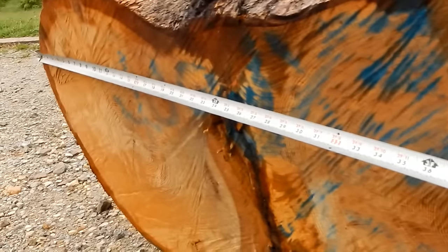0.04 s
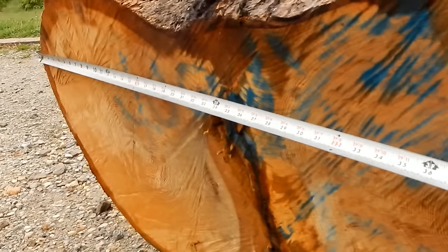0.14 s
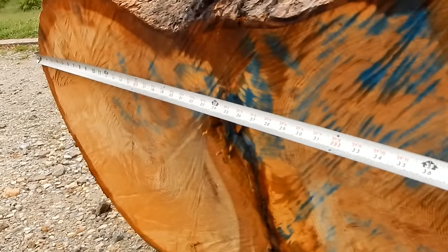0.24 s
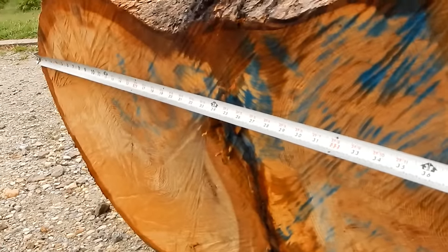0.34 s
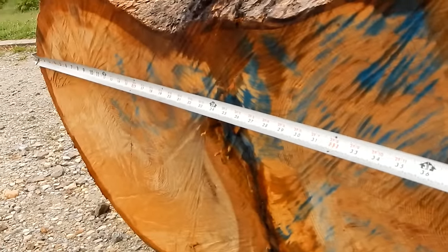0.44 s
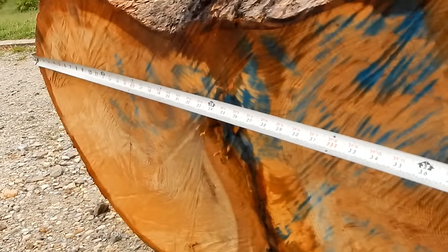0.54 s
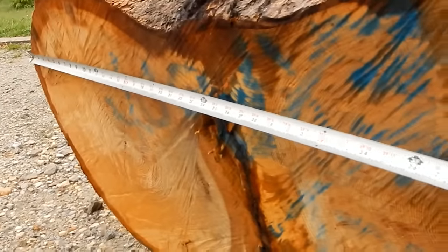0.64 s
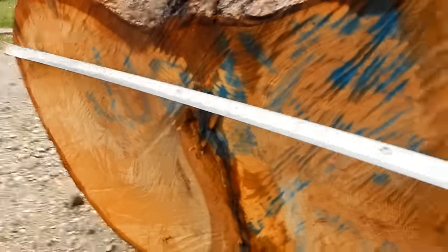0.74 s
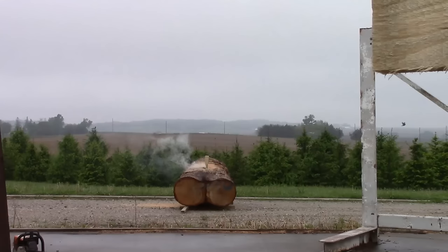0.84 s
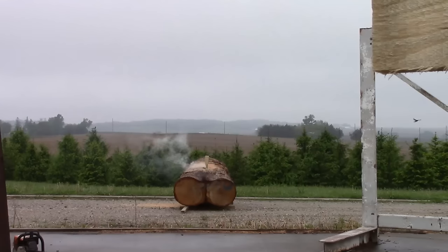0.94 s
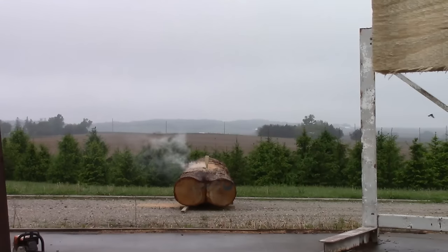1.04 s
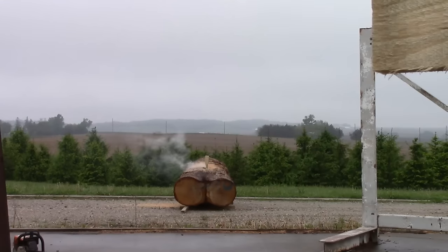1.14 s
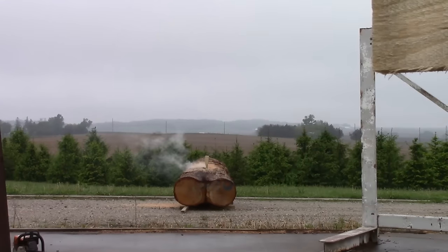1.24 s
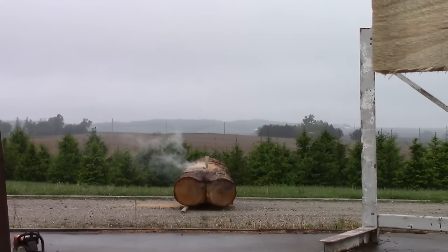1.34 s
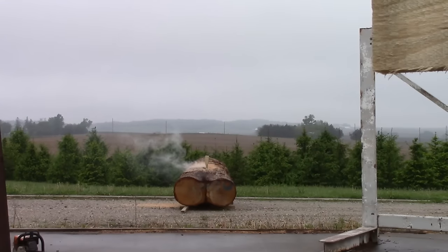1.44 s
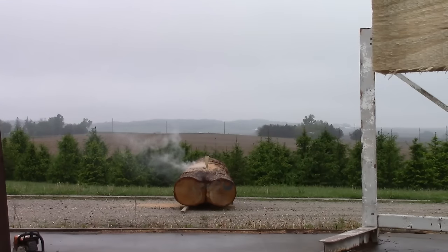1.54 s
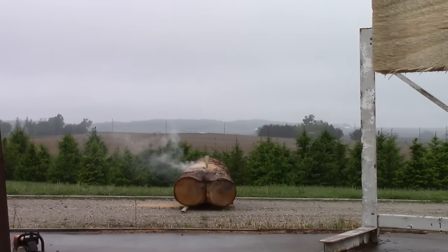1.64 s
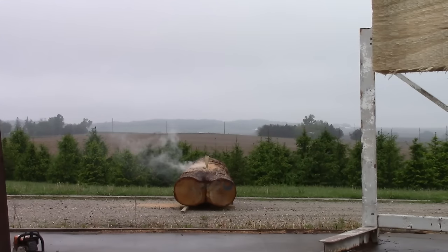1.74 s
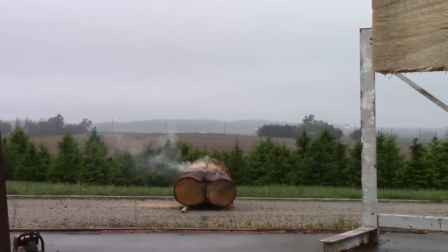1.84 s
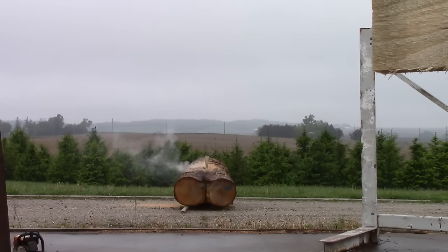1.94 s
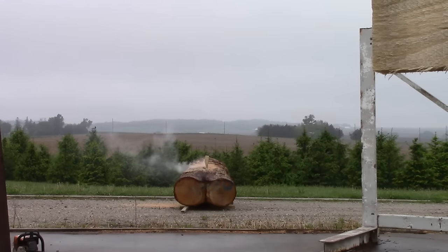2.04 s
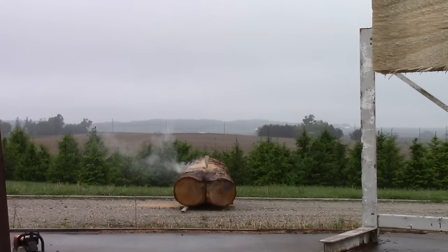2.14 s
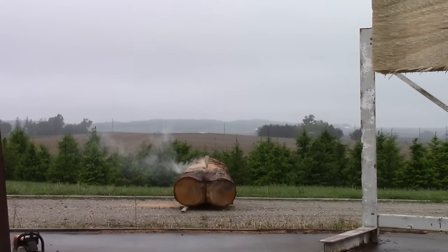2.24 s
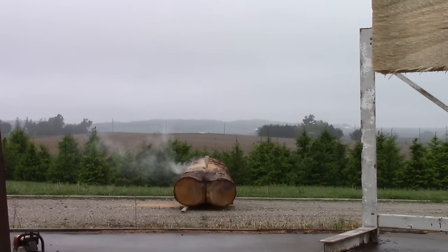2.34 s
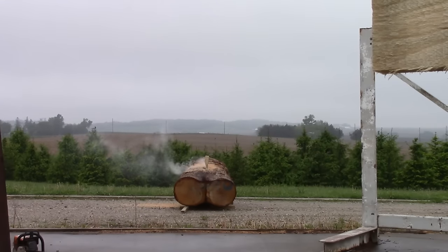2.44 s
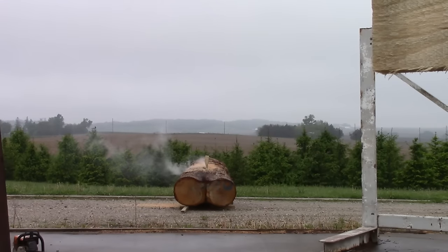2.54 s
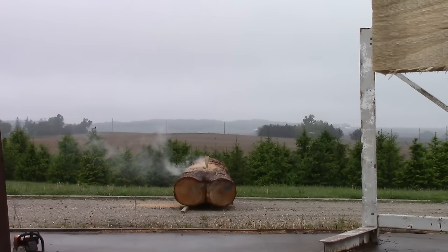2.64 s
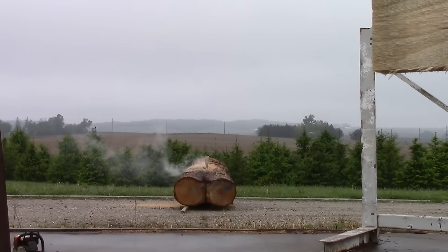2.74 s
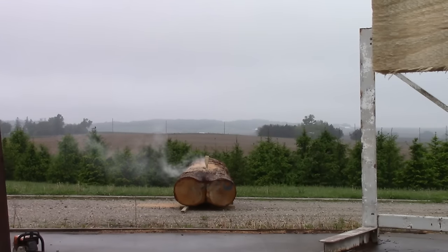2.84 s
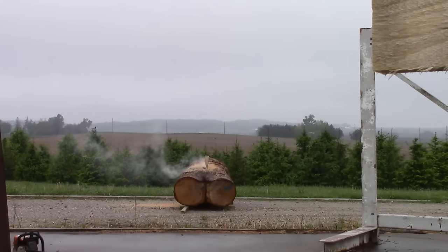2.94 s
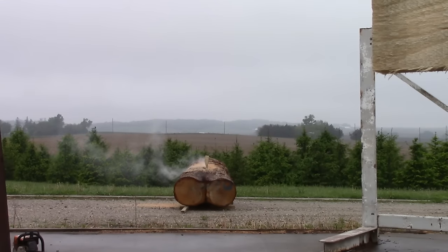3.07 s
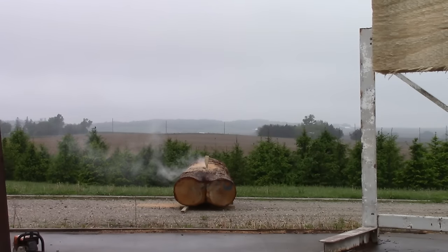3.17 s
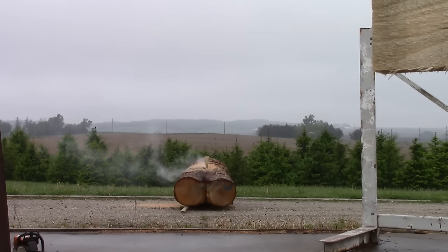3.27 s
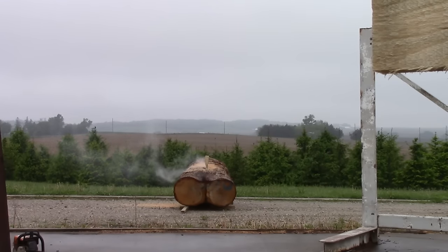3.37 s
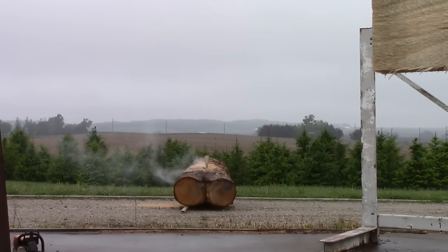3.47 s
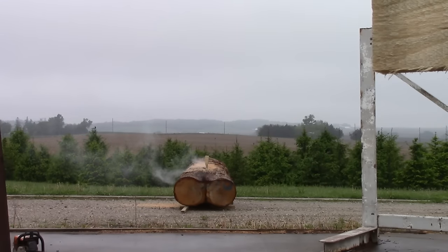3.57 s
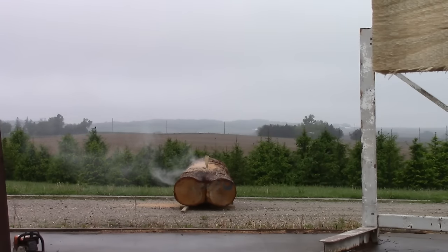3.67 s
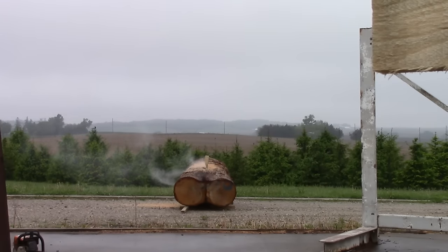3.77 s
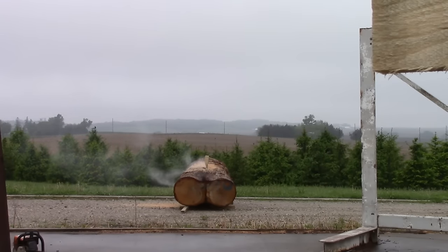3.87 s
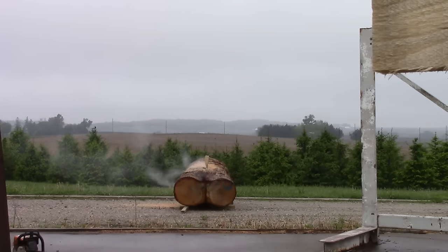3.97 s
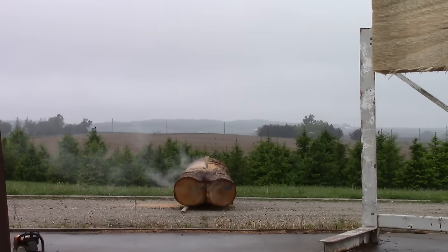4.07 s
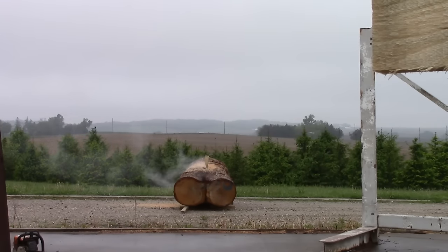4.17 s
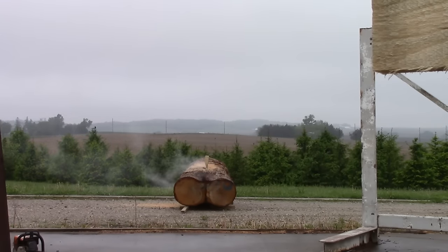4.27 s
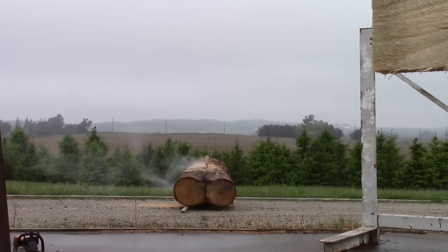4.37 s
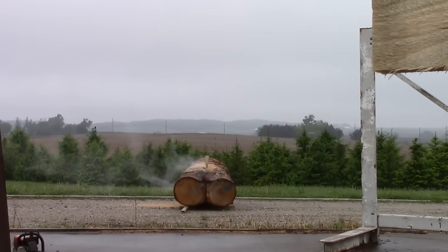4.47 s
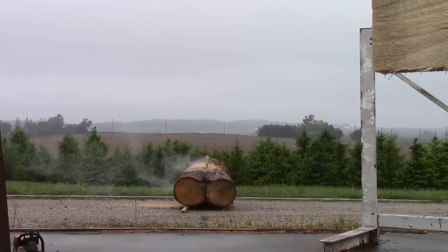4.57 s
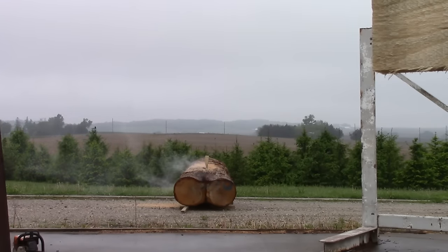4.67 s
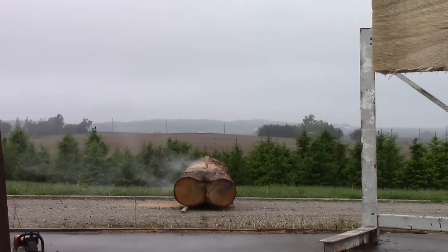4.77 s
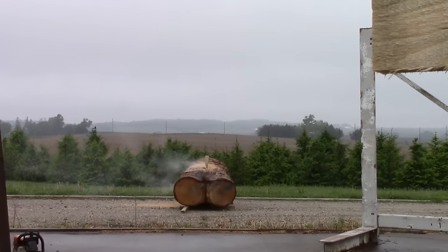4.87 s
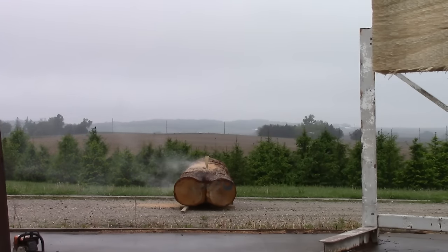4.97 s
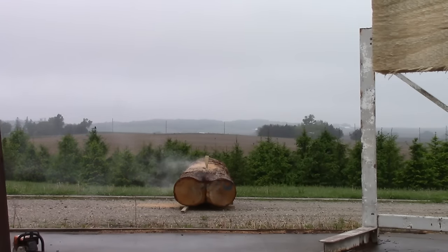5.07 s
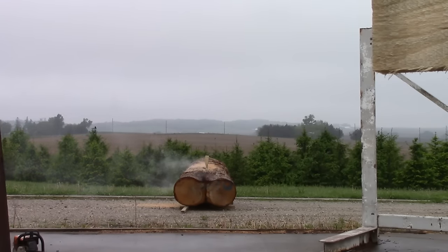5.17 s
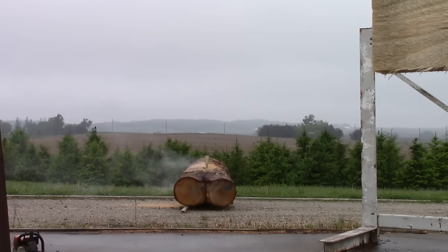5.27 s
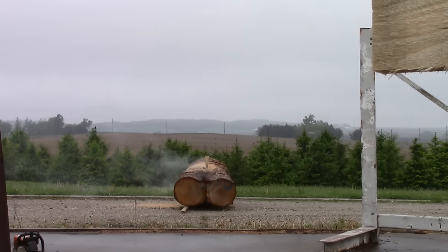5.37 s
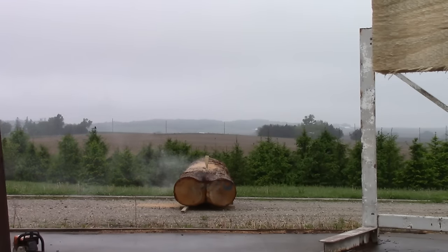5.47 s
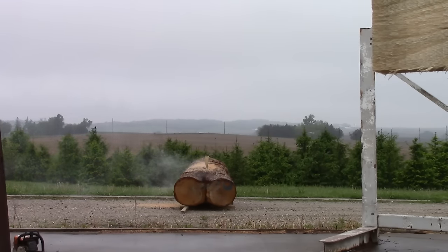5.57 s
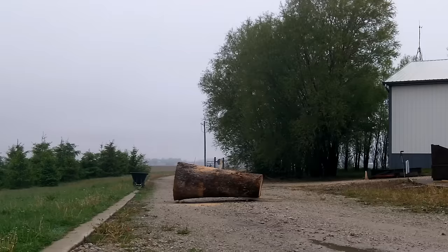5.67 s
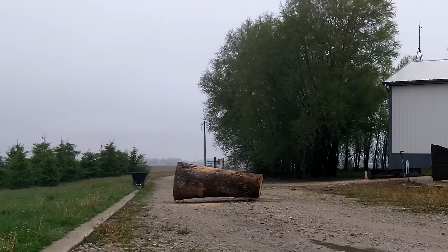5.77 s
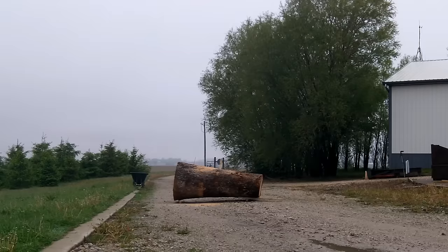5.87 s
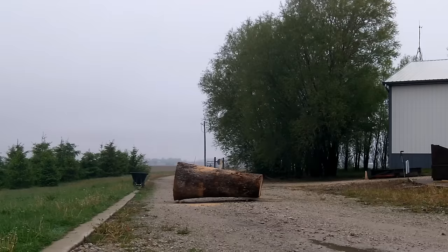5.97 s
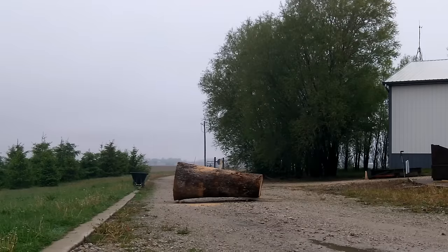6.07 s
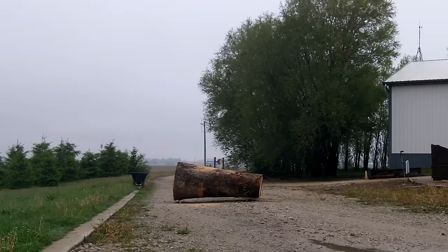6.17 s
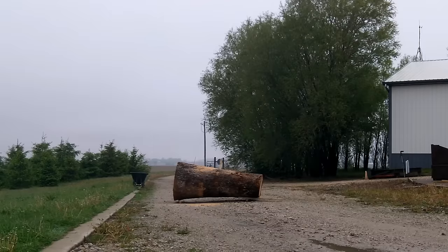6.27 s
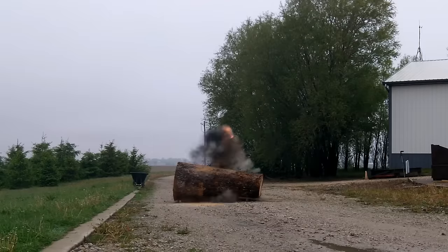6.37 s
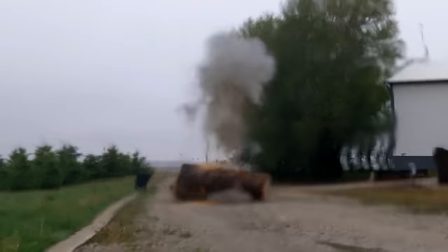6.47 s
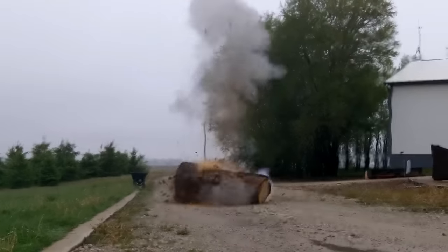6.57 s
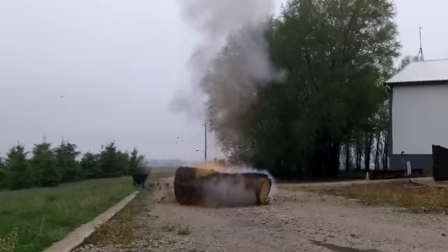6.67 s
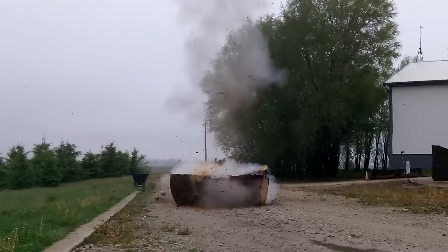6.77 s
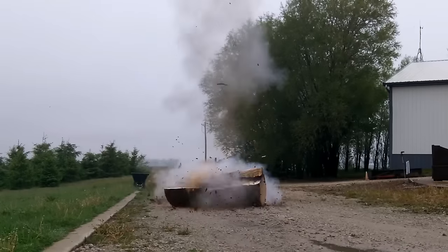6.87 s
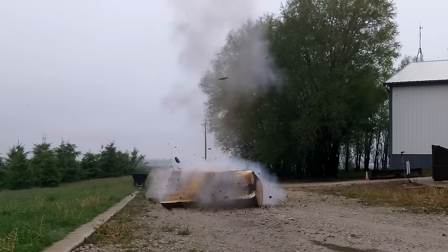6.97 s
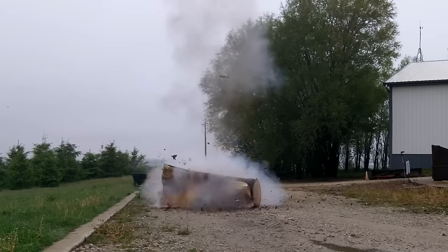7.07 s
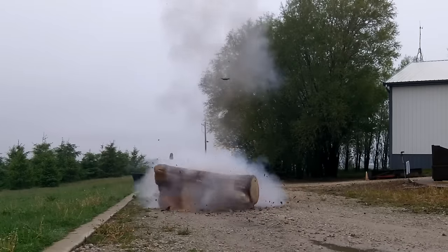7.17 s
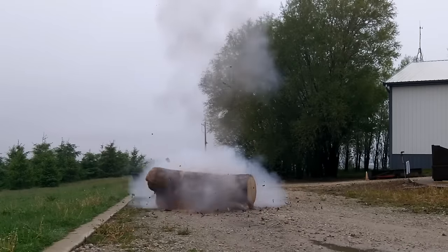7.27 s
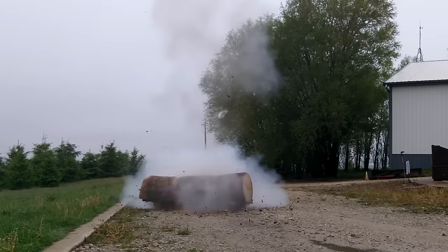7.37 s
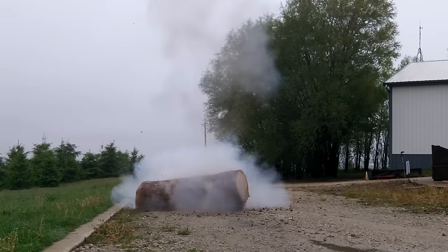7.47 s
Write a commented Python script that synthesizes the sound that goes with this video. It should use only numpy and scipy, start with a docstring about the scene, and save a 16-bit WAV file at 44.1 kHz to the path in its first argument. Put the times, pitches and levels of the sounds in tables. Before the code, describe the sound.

After a short machine hum, quiet birdsong in an open yard is broken by one distorted blast, rumbling echoes and falling wood debris.

```python
"""A powder charge splits a log in an open yard: the shock overloads the microphone, echoes boom back
from sheds and trees, and wood chips patter down on gravel. The piece opens on a machine's motor
humming in stereo, then cuts to the yard in mono. There birds whistle and trill over far traffic
and treble hiss, and wind thumps on the microphone in the last second before the blast."""
import sys
import numpy as np
from scipy import signal
from scipy.fft import rfft, irfft, next_fast_len
from scipy.io import wavfile
from scipy.ndimage import uniform_filter1d

SR = 44100
rng = np.random.default_rng(int(sys.argv[2]) if len(sys.argv) > 2 else 0)


def dump(signal):
    """Clip the signal to [-1, 1] and save it as 16-bit WAV at the path in sys.argv[1]."""
    limited = np.clip(np.atleast_2d(signal).T, -1, 1)
    pcm = np.round(limited * 32767).astype(np.int16)
    wavfile.write(sys.argv[1], SR, pcm)


N = 331191
T = np.arange(N) / SR

# The shock, then its echoes, ahead of the overload: start_s, boom_db, boom_hz, crack_db, roar_db
ARRIVALS = [(6.5166, 4, 224, -17, -17), (6.5199, 25, 139.5, 5, -12.5), (6.55, -2, 247, -11.5, -21),
            (6.563, 3, 106, -6.5, -21), (6.585, 1.5, 161, -20, -38), (6.622, -6, 114, -26, -30),
            (6.635, 11, 118.4, -7, -16), (6.656, 1, 174.4, -8.5, -35), (6.7142, -19, 112, -20, -23),
            (6.7416, -4.5, 176, -15, -32), (6.866, -11, 124, -30, -30.5), (6.9024, -17, 100, -42, -49),
            (6.938, -9.5, 110, -38, -40), (7.0248, -15.5, 259, -31, -29), (7.0555, -8, 115.5, -45, -51),
            (7.16, -27, 193, -42, -28.5), (7.188, -7.5, 125, -34, -41), (7.238, -17, 100.5, -50, -42.5),
            (7.307, -15, 95.3, -36, -30)]
# Fader moves of the rolling tail: time_s, rumble_db, roar_db
TAIL_LEVELS = [(6.525, -29, -31.5), (6.63, -12, -26), (6.71, -16, -27.5), (6.8, -20.5, -33.5),
               (7.1, -24.5, -40.5), (7.2, -25, -40.5), (7.5, -26, -25)]
# EQ of the tail's low rumble: freq_hz, gain_db
RUMBLE_EQ = [(12, -40), (20, -15), (49, 2), (107, -2), (137, 0.5), (182, -10), (300, -29), (390, -38),
             (660, -120)]
# EQ of the tail's midrange roar: freq_hz, gain_db
ROAR_EQ = [(150, -19), (250, -3), (469, -8), (513, -8.5), (747, -13.5), (817, -11), (1280, -12.5),
           (3610, -16), (4790, -23.5), (7410, -41), (9000, -68), (11700, -81), (19800, -120)]
def blast():
    """Each arrival is a low pressure swing with a thud, a crack and a roar; scattered echoes roll on."""
    out, swell = np.zeros(N), np.zeros(N)
    t = np.arange(int(.3 * SR)) / SR
    for start, boom_db, hz, crack_db, roar_db in ARRIVALS:
        delay = start - ARRIVALS[0][0]
        pitch = hz * (1 - .58 * np.exp(-t / .00408))  # hot gas makes the first swing slower
        ring_cycles = 6 + 20.5 * delay  # late echoes come from deeper scenery and ring longer
        decay = np.exp(-np.log(1000) * t * hz / ring_cycles)
        polarity = 1 if delay else -1  # the small first arrival pulls, the others push
        add(out, start, polarity * undb(boom_db) * decay * sine(pitch))
        add(out, start, undb(crack_db + 6) * knock(247, t60_s=.045, spread=1.95))  # thud
        add(out, start - .0013, undb(crack_db) * knock(2200, t60_s=.016, spread=2.4))  # crack leads
        add(swell, start, undb(roar_db) * np.minimum(t / .0027, 1) * np.exp(-t / .022))
    splinters = band(rng.standard_normal(int(.009 * SR)), 400, 2400)
    add(out, 6.5185, undb(16) * splinters)
    # Many far reflectors return uneven lumps of sound.
    rumble = undb(curve(TAIL_LEVELS) + 2.06 * walk(30)) * colour(rng.standard_normal(N), RUMBLE_EQ)
    roar_level = np.hypot(undb(curve(TAIL_LEVELS, col=2)), swell)
    lumps = undb(1.9 * walk(60) + 2.1 * walk(250))
    roar = roar_level * lumps * colour(rng.standard_normal(N), ROAR_EQ)
    fade_in = np.clip((T - TAIL_LEVELS[0][0]) / .0088, 0, 1)
    return out + fade_in * (rumble + roar)


# Wood chips landing close by: start_s, level_db, pitch_hz
CHIP_HITS = [(6.672, -10.5, 2300), (7.28, -26, 1170), (7.336, -17.5, 1760), (7.349, -9.5, 1240),
             (7.357, -15, 1500), (7.416, -9, 1330), (7.428, -13, 800), (7.437, -10, 1720),
             (7.452, -12, 2480), (7.46, -21, 2780), (7.473, -10, 1000), (7.478, 0.5, 1060)]
# Fader moves of the fine debris: time_s, level_db
PATTER_LEVELS = [(6.6, -44), (7.1, -39.5), (7.33, -35.5), (7.41, -39), (7.485, -18.5)]
def debris():
    """Single wood chips hit the gravel over a patter of small grains of very uneven size."""
    hits = np.zeros(N)
    for start, db, hz in CHIP_HITS:
        add(hits, start, undb(db) * knock(hz, t60_s=.025, spread=1.95))
    landings = rng.random(N) < 1200 / SR  # 1200 grains a second
    grains = landings * undb(1.5 * rng.exponential(size=N)) * rng.standard_normal(N)
    level = undb(curve(PATTER_LEVELS)) * (T > PATTER_LEVELS[0][0])
    return hits + level * unit(band(grains, 1000, 2420))


def overload(x, top_hz=7100, ceiling=.92, buzz_leak=.25):
    """The capsule passes little treble and clips the shock; most of the resulting buzz is softened."""
    dull = signal.sosfilt(signal.ellip(4, 2, 24, top_hz, fs=SR, output="sos"), x)
    clipped = np.clip(dull, -ceiling, ceiling)
    return buzz_leak * clipped + (1 - buzz_leak) * one_pole(clipped, 4060)


# Pitch dive of one trill chirp: time_s, pitch_hz
CHIRP_PITCH = [(0, 4900), (.01, 5200), (.0112, 4400), (.0126, 3300), (.014, 2750), (.021, 2650)]
# The chirp's lead-in, accent and tail: centre_s, width_s, level_db
CHIRP_SWELLS = [(.004, 0.0036, -20), (.0114, 0.00097, 0.5), (0.0157, .003, -8.5)]
def trill(count=17, start_s=5.1068, gap_s=.03347, peak_s=5.26):
    """A close bird's run of falling chirps swells and fades; nearby leaves scatter each one."""
    out = np.zeros(N)
    t = np.arange(int(.024 * SR)) / SR
    envelope = sum(undb(db) * np.exp(-((t - centre) / width) ** 2) for centre, width, db in CHIRP_SWELLS)
    chirp = envelope * sine(np.interp(t, *np.transpose(CHIRP_PITCH)))
    times = start_s + gap_s * np.arange(count) + .0008 * rng.standard_normal(count)
    levels_db = -36.5 - 33 * (times - peak_s) ** 2 + 1.4 * rng.standard_normal(count)
    for time, db in zip(times, levels_db):
        leaves = undb(-29) * rng.standard_normal(len(t)) * np.exp(-t / .006)
        leaves[0] += 1  # direct sound
        add(out, time - CHIRP_PITCH[1][0], undb(db) * np.convolve(chirp, leaves))
    return out


# Held bird notes: start_s, length_s, pitch_hz, level_db
HELD_NOTES = [(1.02, 0.082, 2900, -57), (1.063, 0.057, 2520, -44.5), (1.109, 0.097, 3000, -55.5),
              (1.125, 0.023, 2510, -48), (1.332, 0.154, 2470, -50.5), (2.045, 0.032, 2070, -50.5),
              (2.135, .03, 2120, -56), (2.234, 0.087, 3740, -54), (2.36, 0.024, 2480, -46),
              (2.365, 0.027, 3130, -39), (2.417, 0.023, 6260, -56), (2.478, 0.017, 2470, -50),
              (2.479, 0.031, 3130, -44), (2.51, 0.035, 2490, -54), (2.6, .04, 3120, -52),
              (2.624, 0.017, 2830, -48), (2.678, 0.073, 2070, -58), (2.95, .07, 2200, -61),
              (2.76, 0.047, 2490, -47.5), (3.199, 0.0086, 3400, -41.5), (3.654, 0.071, 2110, -52),
              (3.981, 0.087, 2500, -44), (4.109, .028, 2500, -52), (4.143, 0.036, 1840, -54),
              (4.163, 0.037, 2490, -49.5), (4.268, 0.021, 3330, -48.5), (4.32, 0.01, 3330, -49),
              (4.495, 0.047, 2373, -45.5), (6.072, 0.023, 4030, -53), (6.085, .039, 2450, -48.5),
              (6.302, 0.065, 2530, -49), (6.43, 0.077, 2480, -44)]
# Sliding bird notes: start_s, length_s, start_hz, middle_hz, end_hz, level_db
SLURRED_NOTES = [(.024, 0.067, 2230, 1970, 1660, -46), (1.024, 0.18, 5730, 5980, 6080, -56.5),
                 (1.938, 0.051, 2755, 3030, 2720, -38.5), (2.009, 0.026, 2460, 3050, 2230, -41),
                 (2.099, 0.031, 2440, 2970, 2220, -46), (2.32, .035, 3180, 3220, 3080, -49),
                 (2.553, 0.025, 2730, 3250, 3450, -38), (2.582, 0.019, 2810, 2750, 2070, -41),
                 (3.15, 0.046, 3600, 3170, 2520, -39), (3.235, .035, 4550, 4070, 3640, -56),
                 (3.281, 0.038, 2470, 2310, 2180, -47.5), (3.682, 0.022, 3040, 3250, 3320, -47.5),
                 (3.699, 0.049, 2850, 2740, 2470, -43), (3.785, .05, 2515, 3130, 3690, -38.5),
                 (3.831, 0.039, 3080, 2850, 2650, -39.5), (3.941, .038, 4830, 4700, 4340, -50.5),
                 (4.065, .02, 4230, 4120, 4000, -47.5), (4.343, .036, 2880, 3130, 3240, -40.5),
                 (4.372, 0.033, 4450, 4300, 4100, -48.5), (4.4, .033, 2330, 2080, 1970, -46.5),
                 (4.475, .022, 1930, 2220, 2400, -46.5), (4.535, .022, 4660, 5340, 3630, -46.5),
                 (5.092, 0.013, 3420, 3450, 3540, -48), (5.41, 0.037, 3040, 3150, 3250, -52)]
# Bird notes with fast vibrato: start_s, length_s, start_hz, middle_hz, end_hz, level_db
WARBLED_NOTES = [(1.16, 0.13, 2250, 2450, 2630, -48), (4.376, 0.0298, 2850, 2590, 2320, -41)]
# A far bird's short falling chirps: start_s, level_db
FAR_CHIRPS = [(3.354, -54), (3.387, -55), (3.474, -56), (3.59, -56), (3.709, -55), (3.74, -62),
              (3.827, -51), (4.19, -49.5)]
def whistles(pad_s=.004, warble_rate_hz=62):
    """Birds sing near-sine notes that glide, swell and fade, quavering in pitch and level."""
    out, quaver = np.zeros(N), walk(45)
    far = [(start, .0083, 4860, 4360, 4000, db) for start, db in FAR_CHIRPS]
    plain = [*HELD_NOTES, *SLURRED_NOTES, *far, *chorus()]
    for notes, depth_hz in [(plain, 0), (WARBLED_NOTES, 260)]:
        for start, length, *pitches, db in notes:
            span = length + 2 * pad_s
            n = int(span * SR)
            progress, waver = np.linspace(0, 1, n), quaver[int(start * SR):]
            glide = np.interp(progress, np.linspace(0, 1, len(pitches)), pitches)
            pitch = uniform_filter1d(glide, n // 5) * (1 + .0069 * waver[n:0:-1])
            warble = depth_hz * np.sin(2 * np.pi * warble_rate_hz * span * progress)
            envelope = np.sin(np.pi * progress) ** .53 * undb(db + 1.9 * waver[:n])
            add(out, start - pad_s, envelope * sine(pitch + warble))
    return out


def chorus(count=70):
    """Faint random notes of far birds, as rows: start_s, length_s, start_hz, end_hz, level_db."""
    when, length, pitch, slide, level = rng.random((count, 5)).T
    start_hz = 2100 + 1500 * pitch
    end_hz = start_hz * (1 + .2 * (slide - .6))
    return np.column_stack([1 + 5.4 * when, .015 + .05 * length, start_hz, end_hz, -62 + 6 * level])


# A dry tick among the calls: start_s, level_db, pitch_hz
BIRD_TICKS = [(1.9677, -24, 2280)]
def birds():
    """Whistles, the trill and a tick, smeared by a short reverb from the trees."""
    calls = whistles() + trill()
    for start, db, hz in BIRD_TICKS:
        add(calls, start, undb(db) * band(knock(hz, t60_s=.025, spread=1.4), hz / 1.6, hz * 1.6))
    t = np.arange(int(.2 * SR)) / SR
    trees = rng.standard_normal(len(t)) * np.exp(-t / .057) * np.minimum(t / .002, 1)
    return calls + undb(-37.5) * signal.fftconvolve(calls, trees)[:N]


# Motor tones: pitch_hz, level_db
MOTOR_TONES = [(70.0, -51), (156.1, -53), (236.9, -56), (312.2, -50.5), (355.3, -49.5), (468.3, -64.5)]
# EQ of the room tone around the machine: freq_hz, gain_db
ROOM_EQ = [(15, -35), (25, 7.5), (76, -4), (195, -9), (236, -6.5), (277, -9), (354, -10), (439, -13),
           (3080, -24.5), (13600, -30), (16000, -31)]
# EQ of the room tone's stereo side signal: freq_hz, gain_db
SIDE_EQ = [(15, -33), (25, 3), (84, 1.5), (575, -12.5), (2050, -13), (2550, -16.5), (11900, -19),
           (16000, -26)]
def machine():
    """A motor's wavering tones over room tone, widened by noise of opposite polarity left and right."""
    hum = sum(undb(db + .5 * walk(9.6)) * 2 ** .5 * sine(hz * (1 + .0035 * walk(5.2)))
              for hz, db in MOTOR_TONES)
    side = undb(-52.5) * colour(rng.standard_normal(N), SIDE_EQ)
    room = undb(-41.5) * air(ROOM_EQ, flicker_db=.78)
    return hum + room + np.array([side, -side])


# Fader moves of the far traffic: time_s, level_db
TRAFFIC_LEVELS = [(.8, -63), (3.1, -61), (3.5, -54), (3.85, -50.5), (4.2, -58), (4.8, -55.5), (5.3, -59.5),
                  (6.2, -58), (6.5, -49.5)]
# Gusts on the microphone: time_s, level_db
GUST_LEVELS = [(5.6, -65), (5.722, -40.5), (5.862, -59), (5.942, -37), (6.228, -46), (6.244, -35.5),
               (6.352, -59), (6.458, -55), (6.5, -35)]
# EQ of the treble hiss: freq_hz, gain_db
HISS_EQ = [(4590, -53), (7800, -9.5), (8030, -12.5), (8660, -0.5), (9580, 3.5), (14700, 3.5), (15600, -1)]
# EQ of the open-air bed: freq_hz, gain_db
YARD_EQ = [(15, -33.5), (25, 3), (85, -4.5), (245, -17.5), (335, -15.5), (504, -15.5), (568, -15.5),
           (641, -15), (964, -14.5), (2980, -17.5), (3210, -16), (7090, -28.5), (7800, -63.5), (10100, -85),
           (17200, -120)]
def yard():
    """Open air, a far car, wind thumps and a hiss that sinks and flickers from the blast onward."""
    car = unit(band(rng.standard_normal(N), 865, 1655))
    wind = unit(band(rng.standard_normal(N), 31.7, 57.4))
    wind *= undb(curve(GUST_LEVELS)) * (T > GUST_LEVELS[0][0])
    dip_db = (13 + 5 * walk(90)) * (T > ARRIVALS[0][0])
    hiss = undb(-61.5 - dip_db) * colour(rng.standard_normal(N), HISS_EQ)
    bed = undb(-50.5) * air(YARD_EQ, flicker_db=.91)
    car *= undb(curve(TRAFFIC_LEVELS) + .32 * walk(4.3))
    return bed + car + wind + hiss


def air(eq, flicker_db):
    """A noise bed whose octaves flicker independently; rms 1."""
    octaves = (undb(flicker_db * walk(9)) * band(rng.standard_normal(N), hz / 2 ** .5, hz * 2 ** .5)
               for hz in 25 * 2. ** np.arange(10))
    return colour(sum(octaves), eq)


def knock(hz, t60_s, spread):
    """A dry hit: a brief scrape, a sharp front and a short burst of noise around hz; peak 1."""
    t = np.arange(int(.05 * SR)) / SR - .0015
    envelope = np.exp(-np.log(1000) * np.where(t > 0, t / t60_s, -t / .006))
    burst = envelope * rng.standard_normal(len(t))
    burst[np.abs(t) < 1.5 / SR] += 2.5  # the front
    hit = band(burst, hz / spread, hz * spread)
    return hit / np.abs(hit).max()


def colour(x, eq):
    """Shape x with an EQ curve of (freq_hz, gain_db) points; rms 1."""
    hz, db = np.transpose(eq)
    size = next_fast_len(N)
    log_hz = np.log(np.arange(size // 2 + 1) * SR / size + .0016)
    gain = undb(np.interp(log_hz, np.log(hz), db, -120, -120))
    return unit(irfft(rfft(x, size) * gain, size)[:N])


def walk(rate_hz):
    """Slow modulation: random steps smoothed twice, with a spread near 1."""
    hold = int(SR / rate_hz)
    steps = np.repeat(rng.standard_normal(N // hold + 1), hold)
    return 1.24 * uniform_filter1d(uniform_filter1d(steps, hold), hold)[:N]


def band(x, lo_hz, hi_hz):
    sos = signal.butter(2, [lo_hz, min(hi_hz, .45 * SR)], "band", fs=SR, output="sos")
    return signal.sosfilt(sos, x)


def one_pole(x, hz, kind="low"):
    return signal.sosfilt(signal.butter(1, hz, kind, fs=SR, output="sos"), x)


def sine(pitch_hz):
    return np.sin(2 * np.pi * np.cumsum(pitch_hz) / SR)


def curve(table, col=1):
    rows = np.array(table, float)
    return np.interp(T, rows[:, 0], rows[:, col])


def undb(db):
    return 10 ** (np.asarray(db) / 20)


def unit(x):
    return x / np.sqrt(np.mean(x ** 2))


def add(out, start_s, x):
    i = int(start_s * SR)
    out[i:i + len(x)] += x[:N - i]


def scene(cut_s=.822, muffled_s=.032, crossfade_s=.004):
    """The machine cuts to the yard, which opens briefly muffled; birds and the blast sit on top."""
    inside = np.clip((cut_s - T) / crossfade_s + .5, 0, 1)
    clear = np.clip((T - cut_s - muffled_s) / crossfade_s, 0, 1)
    ambience = yard()
    ambience = clear * ambience + (1 - clear) * one_pole(ambience, 1800)
    explosion = overload(blast() + debris())
    return inside * machine() + (1 - inside) * ambience + birds() + explosion


def record(dry, coupling_hz=55, top_hz=15700):
    """A coupling capacitor lets the flat tops sag, the converter clips again, and the end fades fast."""
    sagged = one_pole(dry, coupling_hz, "high")
    clipped = np.clip(1.05 * sagged, -1, 1)
    fade = np.interp(T, (7.487, 7.5), [1, .05])
    return signal.sosfilt(signal.ellip(8, .2, 80, top_hz, fs=SR, output="sos"), clipped * fade)


dry = scene()
out = record(dry)
dump(out)
```